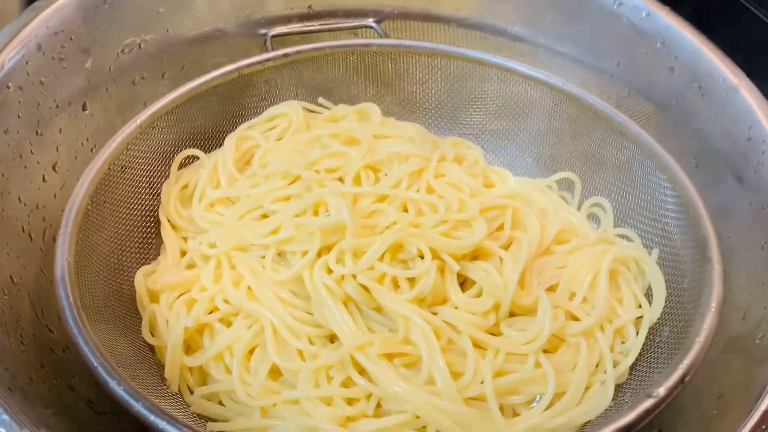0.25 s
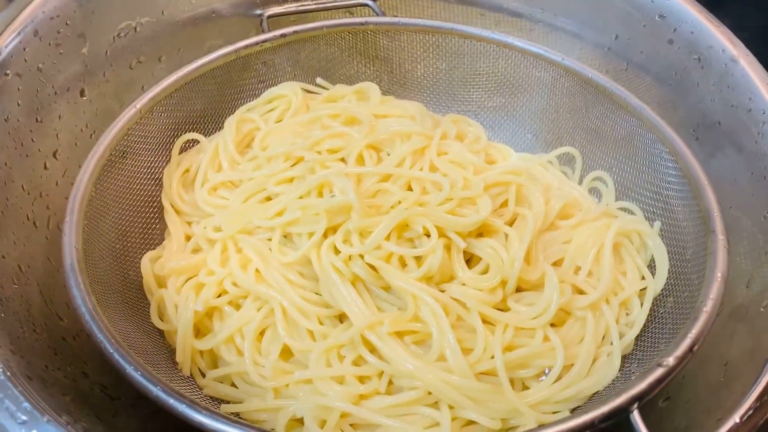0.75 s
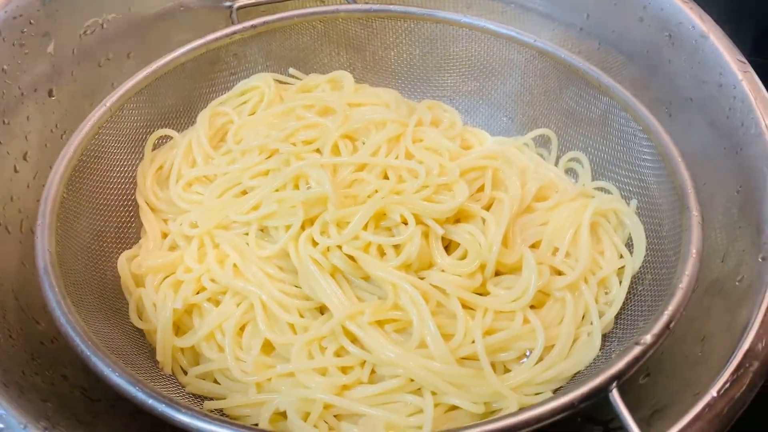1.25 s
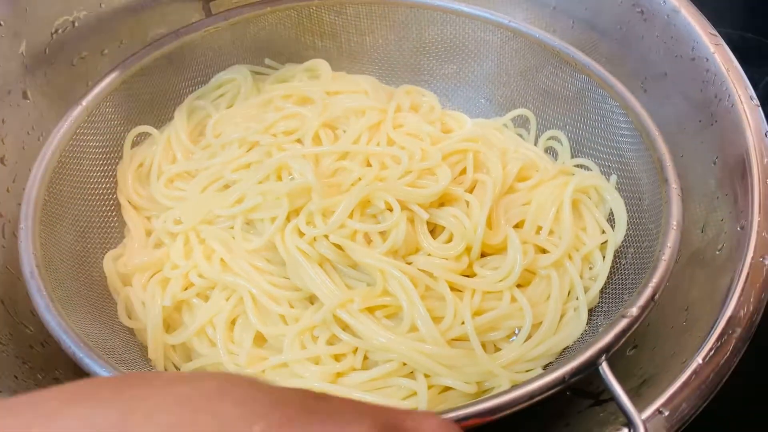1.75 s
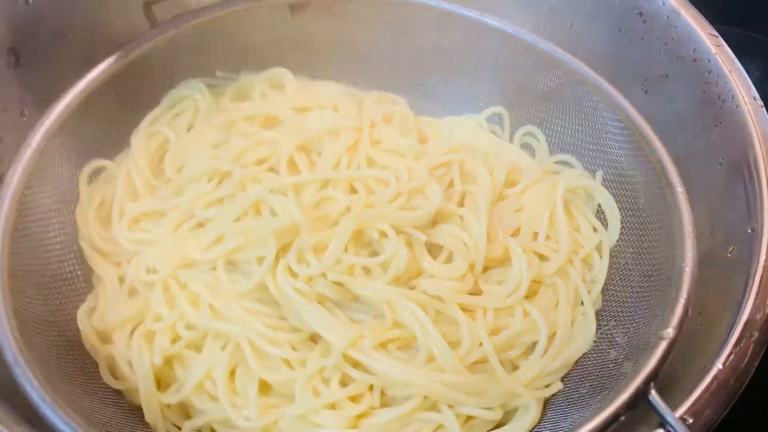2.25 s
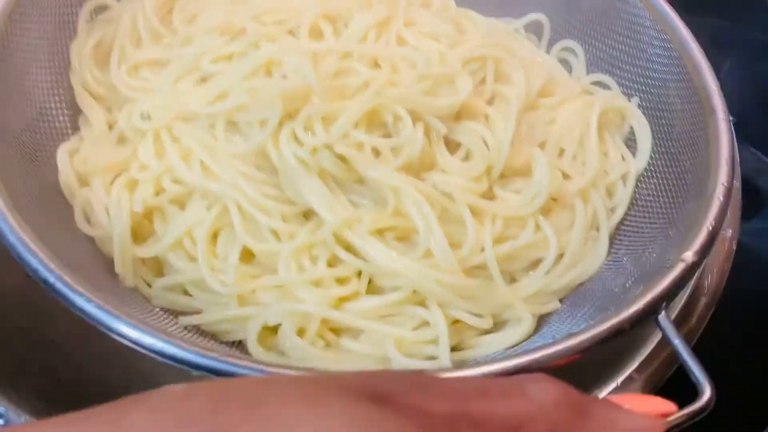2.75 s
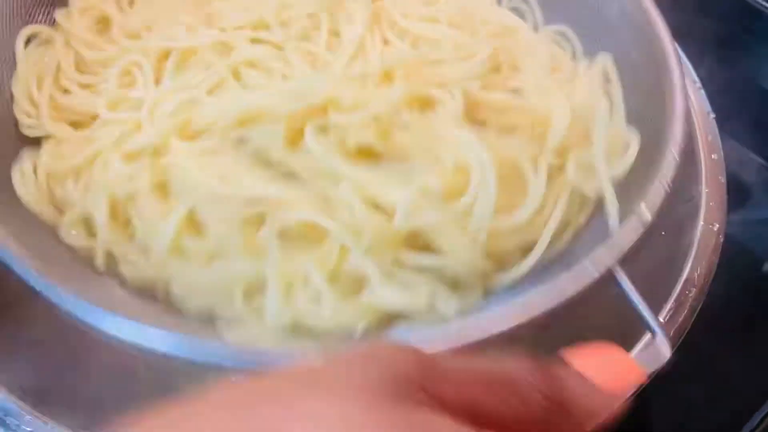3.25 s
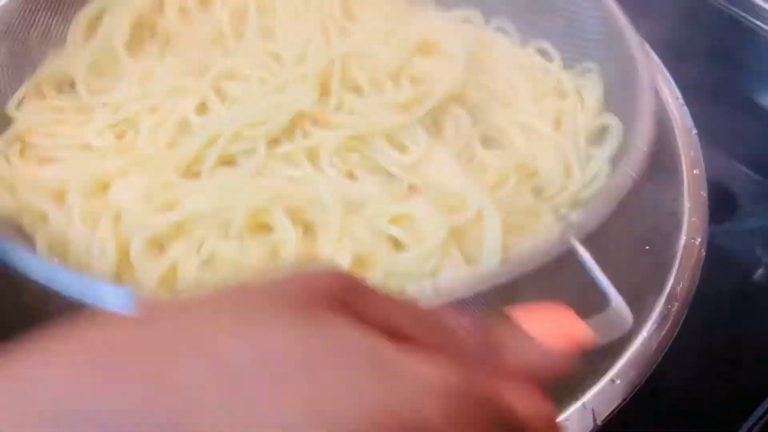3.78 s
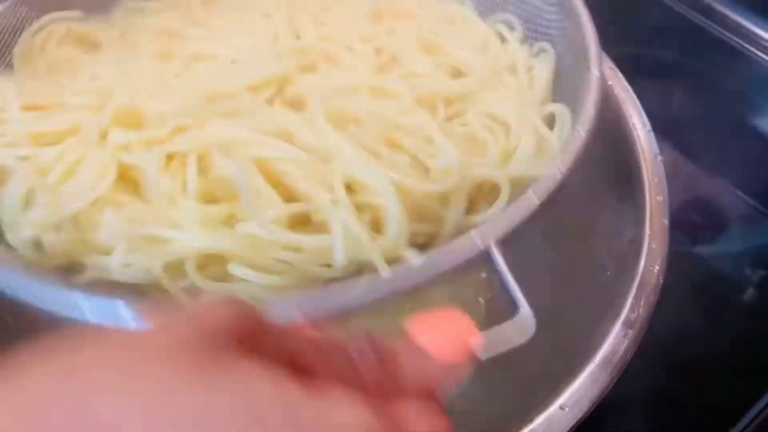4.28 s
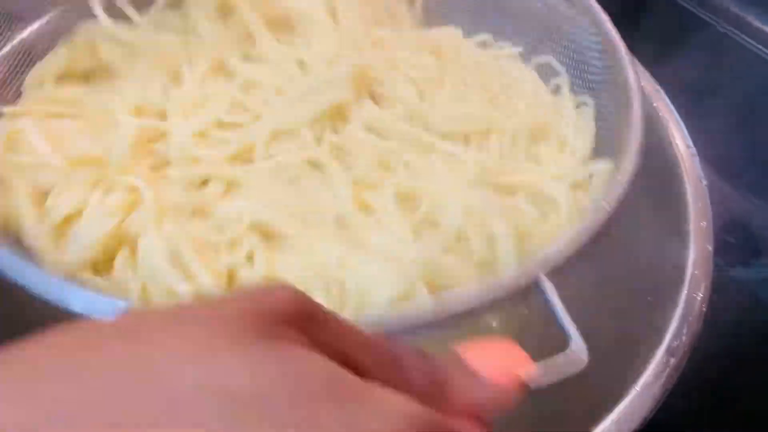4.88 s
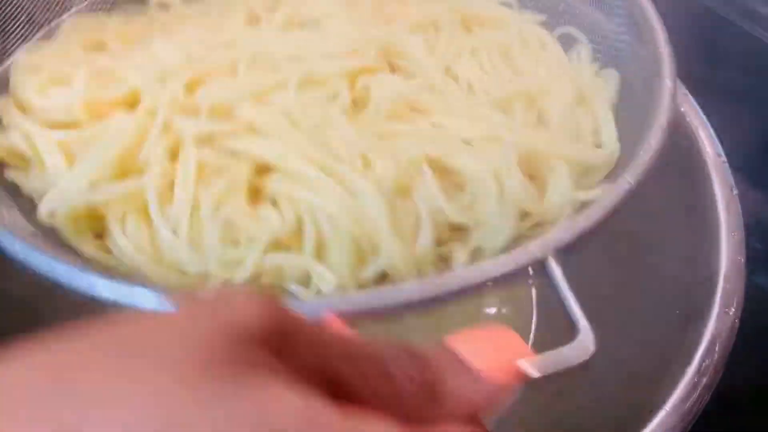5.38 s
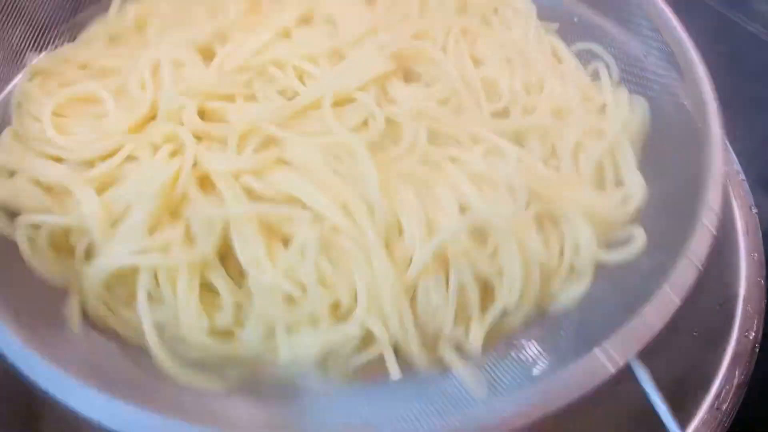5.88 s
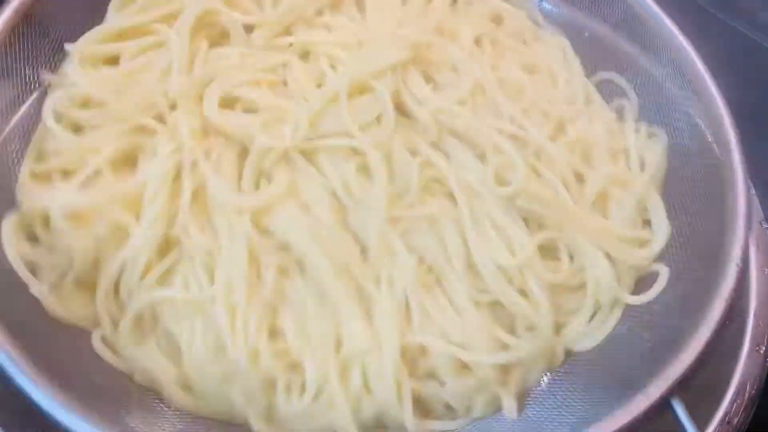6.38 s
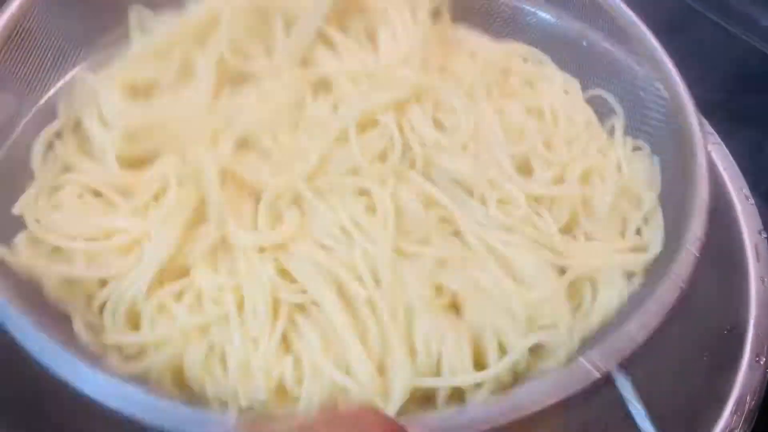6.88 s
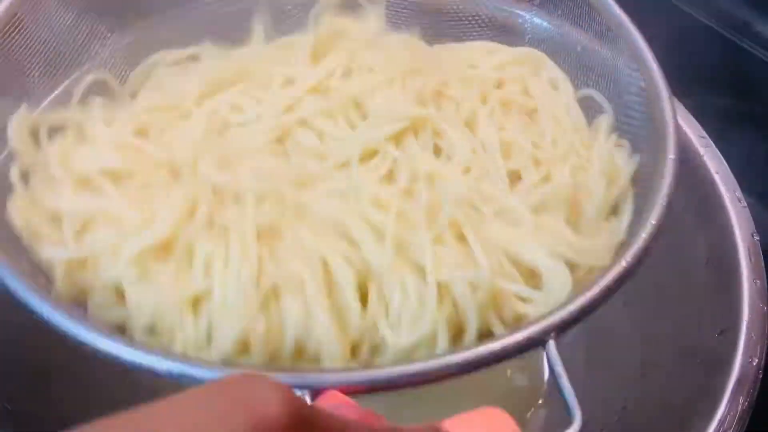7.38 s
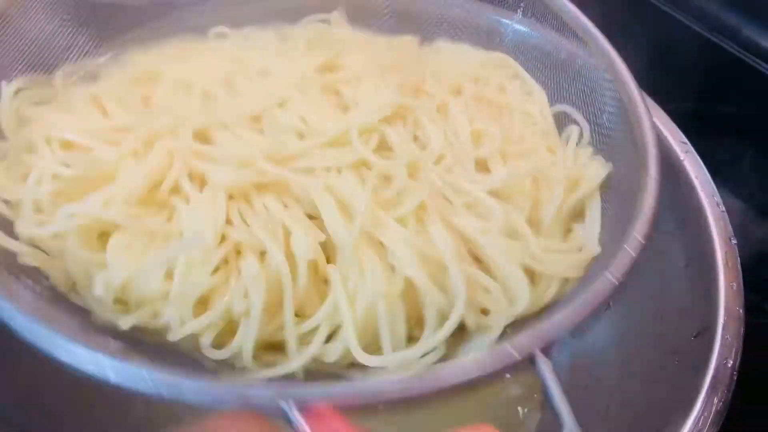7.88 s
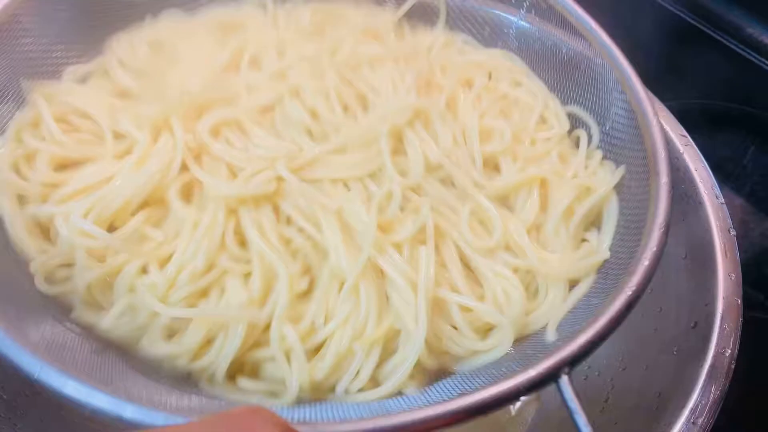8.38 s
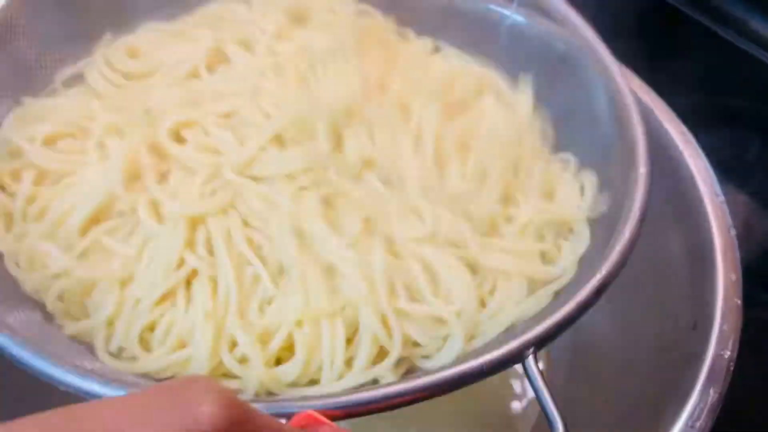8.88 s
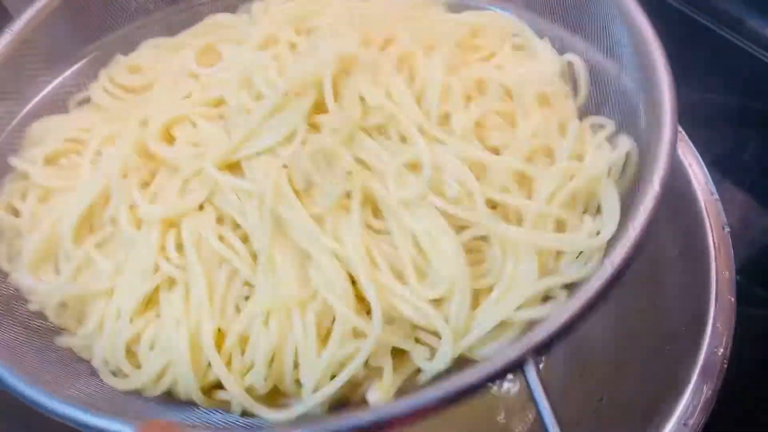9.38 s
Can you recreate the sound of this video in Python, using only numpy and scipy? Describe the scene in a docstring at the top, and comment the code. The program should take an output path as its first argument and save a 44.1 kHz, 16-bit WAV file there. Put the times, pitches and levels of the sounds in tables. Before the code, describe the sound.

Light metallic clinks and one loud pot clank, followed by rapid rhythmic shaking of wet noodles in a strainer, with faint water drips in a kitchen.

```python
"""Shaking wet pasta in a strainer

A mesh strainer of wet pasta clinks in a steel pot on a stove, clanks hard against it as it is lifted, is
shaken about nine times a second, slowing a little, then tossed a few times. Struck modes and noise make the
metal, crackling grains the squelching noodles, short hollow plinks the drips into the pot. A cooker fan
drones under it all; the small kitchen adds a short tail."""
import sys
import numpy as np
from scipy import signal
from scipy.fft import rfft, irfft, next_fast_len
from scipy.io import wavfile
from scipy.ndimage import uniform_filter1d

SR = 44100
rng = np.random.default_rng(int(sys.argv[2]) if len(sys.argv) > 2 else 0)


def transcribe(u):
    """Save the signal u as a 16-bit wav file named by the first command-line argument.

    u: samples, shape (n,) or (channels, n), limited to [-1, 1]; the rate is SR.
    q: integer samples, one column per channel.
    """
    v = np.clip(np.atleast_2d(u).T, -1, 1)
    q = np.round(v * 32767).astype(np.int16)
    wavfile.write(sys.argv[1], SR, q)


N = 424664

# Colour of the fan's drone. Each row: frequency in Hz, relative density in dB per Hz.
FAN_DRONE = [(15, -49), (25, -37), (37, -12), (54, -3), (97, -5), (133, -8), (166, -3), (219, -10.5),
             (241, -7), (303, 0.5), (380, -11.5), (648, -16), (703, -19), (926, -19), (1200, -28),
             (1560, -36.5), (2640, -120)]
# Colour of the fan's air hiss. Each row: frequency in Hz, relative density in dB per Hz.
FAN_HISS = [(600, -4.5), (1200, 4), (2200, 1), (3000, -1), (4300, -3), (5500, -8.5), (7000, -8),
            (11000, -9), (15500, -14)]
# Decay of the room. Each row: frequency in Hz, t60 in seconds.
KITCHEN_DECAY = [(100, 0.39), (500, 0.49), (2000, 0.69), (5000, 0.51), (8000, 0.21), (13000, 0.32)]
# Stereo width. Each row: frequency in Hz, gain of side over mid in dB.
SIDE_WIDTH = [(60, -12.5), (250, -13.5), (400, -9.5), (700, -4.5), (1300, -2.5), (2400, 0.5), (5000, 0.5),
              (6700, -2.5), (7700, -15), (8500, -25), (10000, -2), (13400, -27), (15000, -11)]
# Stereo balance. Each row: frequency in Hz, left over right in dB.
LEFT_LEAN = [(60, 0.5), (110, -4.5), (200, 1.5), (380, 1), (700, 3), (1290, 2), (2380, 0.5), (4400, -2.5),
             (8120, -0.5), (15000, 0.5)]
# Water drops into the pot. Each row: start in seconds, level in dB, pitch in Hz.
DRIPS = [(3.2703, -32, 1690), (4.8026, -28, 2410), (6.149, -45, 1640), (6.6793, -36, 2300),
         (8.1657, -43.5, 1870), (8.526, -42, 4200), (8.8837, -41.5, 1545), (8.9027, -29.5, 1040)]

# The pot base scuffs over the hob. Each row: time in seconds, level in dB.
SCUFF_LEVEL = [(0.0, -26.5), (.1, -35.5), (.16, -28), (.24, -39), (.5, -90)]
# Resonances of the scuffed base. Each row: frequency in Hz, width in Hz, relative level in dB.
BASE_RESONANCES = [(102, 32, -1.5), (203, 36, 1.5), (402, 28, -2.5), (505, 65, -4.5), (570, 42, -12),
                   (616, 19, 5), (1580, 36, -17), (1910, 110, -21)]

# The rim touches the pot. Each row: start in seconds, then knock, lip, hoop and tick level in dB,
# and the life of the touch as t60 in seconds.
CLINKS = [(1.107, -55, -49.5, -42, -46, 0.27), (1.509, -32, -42, -50, -65, .12),
          (1.53, -39, -45.5, -48, -72, 0.3), (1.574, -41.5, -46, -27, -40, 0.28),
          (1.735, -52, -54, -41, -49, 0.18), (1.755, -33.5, -50, -35, -34.5, 0.056),
          (2.164, -35, -35, -23.5, -38, 0.2), (2.234, -38, -49, -53, -58, .08),
          (2.441, -57, -53.5, -42.5, -60, 0.41), (2.487, -58, -59, -38, -35.5, 0.075),
          (2.574, -48, -43.5, -40, -49.5, .14), (8.683, -48, -47.5, -49, -30, 0.039),
          (8.795, -66, -60, -35.5, -43.5, .039)]
# The rim slides on the pot. Each row: middle in seconds, level in dB, spread of the swell in seconds,
# centre in Hz, spread in octaves.
SLIDES = [(0.847, -53, 0.055, 1700, 1.05), (1.006, -54, 0.026, 2020, 1.2),
          (1.127, -51.5, 0.022, 3570, 0.45), (2.026, -50.5, 0.047, 4330, .09),
          (2.033, -52, 0.081, 4700, 1.7), (2.616, -57, 0.15, 2070, 1.2)]
# Modes of the pot's lip. Each row: frequency in Hz, relative level in dB, t60 in seconds.
LIP_MODES = [(1320, 2.5, 0.31), (1394, -17, .3), (1740, 0.5, 0.44), (1890, -4, 0.38), (2150, -1, 0.18),
             (2285, 1.5, 0.11), (2545, 1, 0.18), (3080, -5, .25)]
# Modes of the wire rim. Each row: frequency in Hz, relative level in dB, t60 in seconds.
HOOP_MODES = [(3780, 3, 0.23), (4100, 6.5, 0.099), (4160, 6, 0.11), (4320, -5, 0.29), (4500, 4, 0.11),
              (4540, 3, 0.22), (4650, 0, .12), (5150, 2, 0.1), (5520, -4, 0.071), (5800, -31, 0.12),
              (6040, -6, .25), (6300, -2, 0.13), (7150, -2, 0.11)]

# Modes of the pot wall when free. Each row: frequency in Hz, relative level in dB, t60 in seconds.
POT_MODES = [(443, -1, 0.1), (627, 6.5, 0.081), (756, -5, 0.082), (909, -8, 0.13), (1020, -5, 0.1),
             (1298, -12.5, 0.45), (1340, -25, 0.15), (1620, -8, 0.62), (1740, -10, 0.36), (2105, -10, 1.4),
             (2550, -15, 0.28), (2485, -5.5, 0.11), (3150, -18, 0.21), (3200, -15.5, 0.29),
             (3400, -51, 0.53), (3730, -16, 0.24), (4105, -25, 0.62), (4290, -9, 0.16), (4530, -16, 0.18),
             (4680, -1.5, 0.045), (4823, -16, 0.11), (5663, -34, 0.37), (6153, -24, 0.13), (6300, -38, 0.2),
             (6200, -27, 0.15), (6450, -14, 0.095), (6950, -36, 0.55)]
# Modes of the stove under a landing. Each row: frequency in Hz, relative level in dB, t60 in seconds.
STOVE_MODES = [(57.3, -7, 0.2), (75, -6.5, 0.18), (94, -5.5, 0.16), (119.4, -4, 0.15), (153.2, -1.5, 0.18),
               (169.8, -1, 0.15), (274.2, 4, 0.16), (314, -6.5, 0.089), (347.3, -12.5, 0.13)]
# The strainer's frame, ringing on after the clank. Each row: frequency in Hz, relative level in dB,
# t60 in seconds.
FRAME_MODES = [(275, -9, 1.04), (70.2, 3, 1.46), (490, -6, 1.2), (1130, -21.5, 1.83), (1370, -13.5, 2.5),
               (1630, -5, 0.57), (1900, -16, 0.5), (2090, -4, 0.71), (2611, -5.5, 0.69)]
# Colour of the rattling mesh. Each row: frequency in Hz, relative density in dB per Hz.
CLATTER_COLOUR = [(240, -9.5), (400, 3), (1180, -13), (1680, -8.5), (2840, -15), (4730, -19.5), (8110, -20),
                  (8630, -52), (9040, -20.5), (10400, -24), (16000, -32)]
# The strainer strikes the pot wall. Each row: start in seconds, pot level in dB, clatter level in dB.
STRIKES = [(0.004, -34.5, -38), (0.112, -45, -33), (0.137, -45, -25.5), (0.369, -64, -51),
           (2.715, -14, -12)]
# The pot lands on the hob and rocks. Each row: start in seconds, then thud, pot and clatter level in dB,
# time between landings in seconds, thud loss per landing in dB.
LANDINGS = [(0.124, -23.5, -36.5, -28, .0277, 2.5), (2.725, -8.5, -24.5, -18.5, .0235, 13)]

# The shaking slows as the arm tires. Each row: time in seconds, strokes per second.
TEMPO = [(2.963, 9.737), (4.2, 9.072), (6.8, 8.82), (8.35, 8.695)]
# Strength of the strokes. Each row: time in seconds, level in dB.
VIGOUR = [(2.96, -43), (3.2, -52.5), (4.0, -50), (6.8, -49.5), (8.0, -48), (8.3, -49)]
# The wet heap's fizzle between strokes. Each row: time in seconds, level in dB.
FIZZLE = [(0, -48), (.75, -78), (.84, -54.5), (.92, -68), (1.9, -71), (2.7, -57.5), (8.25, -60),
          (8.46, -62.5), (8.65, -56), (9.6, -58)]
# Colour of the squelch before its hollow. Each row: frequency in Hz, relative density in dB per Hz.
SQUELCH_COLOUR = [(2000, -36), (2900, -19), (3400, -12.5), (4000, -14), (4900, -8), (5600, -9.5),
                  (6600, -1), (7900, -4.5), (8600, 0), (10500, -4.5), (12500, -4), (15500, -8)]
# The loudest snaps of wet strands. Each row: start in seconds, level in dB.
SMACKS = [(2.4254, -39.5), (2.9617, -31), (3.328, -34.5), (3.758, -34), (4.493, -35.5), (4.752, -36.5),
          (5.4321, -33), (5.6002, -34), (6.1, -35), (6.5826, -35), (7.0329, -33.5), (7.2559, -33.5),
          (7.4834, -34.5), (7.9423, -33)]

TOP_HZ = 15800  # the microphone's upper limit
SKEW_HZ, SKEW_LAG_S = 1550, 1 / 4700  # above this frequency the left trails the right by this time

KNOCK_DB, LIP_DB, HOOP_DB, TICK_DB, CRACK_DB = -0.5, -0.3, -4, -0.5, 3.5  # balance of a touch
KNOCK_RISE_S = 0.014  # the dull knock builds up, the tick does not

GRAZE_LEAD_S, GRAZE_DB = 0.009, -12.5  # the rim grazes the wall just before each strike
ROCK_LOSS_DB = 3  # the steel rings this much less at each further landing
FRAME_DB = -32.5
# A low hum blooms after the clank and lingers.
HUM_HZ, HUM_DB, HUM_T60_S, HUM_BLOOM_S = 161, -31.5, 2.97, 0.29

PUSH_DB, PUSH_LATE_S = 1.5, 0.0059  # every second stroke is a push: stronger and a little late
STROKE_SCATTER_DB = 0.6
RISE_S, FALL_S = 0.014, 0.018  # a stroke's swell of crackle
# A few slower tosses at the end, each landing with a soft knock.
TOSS_START_S, TOSS_EVERY_S, TOSS_DB = 9.034, 0.197, -50
TOSS_KNOCK_DB, TOSS_KNOCK_HZ, TOSS_KNOCK_OCTAVES, TOSS_KNOCK_S = -50, 880, 1.15, 0.0092
SMACK_GAIN_DB, SMACK_T60_S = -4, 0.026
SMALL_SMACK_DB, SMALL_SMACK_LEAD_S = -45, 0.009  # faint ones come as each stroke sets in
# The squelch has a hollow resonance that sinks as the heap packs together.
LOOSE_HZ, PACKED_HZ = 4580, 3350
HOLLOW_WIDTH = 0.38  # as a share of its frequency


def amp(db):
    """Decibels to gain."""
    return 10 ** (np.asarray(db) / 20)


def unit(x):
    """Scale to rms 1."""
    return x / np.sqrt(np.mean(x ** 2) + 1e-20)


def along(points, hz):
    """Read (Hz, value) points on a log frequency axis."""
    point_hz, values = np.transpose(points)
    return np.interp(np.log(hz + 1), np.log(point_hz + 1), values)


def curve(rows):
    """One value per sample from (seconds, value) points."""
    return np.interp(np.arange(N) / SR, *np.transpose(rows))


def filtered(x, response):
    """Shape the spectrum of x by a response of frequency."""
    n = x.shape[-1]
    m = next_fast_len(n + 4096)
    return irfft(rfft(x, m) * response(np.fft.rfftfreq(m, 1 / SR)), m)[..., :n]


def noise(colour, size):
    """Mid and side noise of rms 1 with a given colour."""
    return unit(filtered(rng.standard_normal((2, size)), lambda hz: amp(along(colour, hz))))


def band(centre_hz, octaves, size):
    """Mid and side noise of rms 1 that stands for a crowd of modes round a centre."""
    def hump(hz):
        distance = np.log2((hz + 1) / centre_hz) / octaves
        return 1 / (1 + distance ** 4)
    return unit(filtered(rng.standard_normal((2, size)), hump))


def fade(t60, size):
    """Exponential decay."""
    return amp(-60 * np.arange(size) / SR / max(t60, 0.002))


def bell(before_s, after_s, size):
    """A smooth swell that peaks in the middle of its span."""
    t = (np.arange(size) - size // 2) / SR
    return np.exp(-0.5 * (t / np.where(t < 0, before_s, after_s)) ** 2)


def ring(modes, size, attack, scatter_db):
    """Decaying sine modes in mid and side, struck from rest at new strengths for each blow."""
    t = np.arange(size, dtype=np.float32) / SR
    hz, db, t60 = np.float32(modes).T
    gain = amp(db + scatter_db * rng.standard_normal((2, len(hz))))
    gain /= np.sqrt(np.sum(amp(db) ** 2) / 2)  # rms 1 at the start, before attack and scatter
    gain[0] *= (-1) ** np.arange(len(hz))
    gain[1] *= rng.choice([-1, 1], len(hz))
    decay = np.exp(-np.float32(np.log(1000)) * t / t60[:, None])
    waves = np.sin(2 * np.pi * hz[:, None] * t) * decay
    return gain @ waves * (1 - np.exp(-t / attack))


def add(track, s, sound):
    """Mix a sound into a track at time s."""
    i = max(round(s * SR), 0)
    track[:, i:i + sound.shape[1]] += sound[:, :N - i]


def fan():
    """The cooker fan: a steady low drone under soft air hiss."""
    return amp(-48.0) * noise(FAN_DRONE, N) + amp(-60.5) * noise(FAN_HISS, N)


def kitchen(x):
    """The tail of a small hard room: decaying noise, different in mid and side."""
    hz, t, z = signal.stft(rng.standard_normal((2, SR * 2 // 3)), SR, nperseg=256)
    decay = amp(-60 * t / along(KITCHEN_DECAY, hz)[:, None])
    tail = signal.istft(z * decay, SR, nperseg=256)[1]
    tail = np.pad(tail / np.linalg.norm(tail[0]), ((0, 0), (SR // 150, 0)))  # a short gap comes first
    return signal.fftconvolve(x, tail, axes=1)[:, :N]


def drips():
    """A drop slaps the water and the pot gives back a short, hollow plink."""
    out, n = np.zeros((2, N)), SR // 5
    for s, db, hz in DRIPS:
        bubble = ring([(hz, 0, 0.035), (hz * 1.6, -4, 0.03)], n, attack=0.0011, scatter_db=0.5)
        splash = (0.89 * band(hz, 0.23, n) + 0.5 * band(hz * 0.87, 1.0, n)) * fade(0.094, n)
        add(out, s, amp(db - 7) * (0.53 * bubble + splash))
    return out


def scuff(slip_rate=500):
    """The base sticks and slips on the hob; each slip kicks its resonances."""
    slips = rng.standard_normal((2, N)) * (rng.random(N) < slip_rate / SR)

    def base(hz):
        total = 0
        for k, (centre, width, db) in enumerate(BASE_RESONANCES):
            damping = 1j * hz * width
            total = total + (-1) ** k * amp(db) * damping / (centre * centre - hz * hz + damping)
        return total
    return unit(filtered(slips, base)) * amp(curve(SCUFF_LEVEL))


def rim():
    """Light touches of the wire rim: dull knock, pot lip, bright hoop and tick; it also slides."""
    out, n = np.zeros((2, N)), SR // 3
    for s, knock_db, lip_db, hoop_db, tick_db, life in CLINKS:
        knock = band(750, 0.51, n) * fade(0.28, n) * (1 - fade(KNOCK_RISE_S, n))
        lip = ring(LIP_MODES, n, attack=0.00076, scatter_db=3.0) + 0.45 * band(1850, 0.76, n)
        hoop = ring(HOOP_MODES, n, attack=0.0017, scatter_db=1) + 0.41 * band(4670, 0.33, n)
        tick = band(8500, 0.64, n) * fade(life * 0.76, n)
        crack = band(7500, 0.59, n) * fade(0.008, n)
        body = amp(knock_db + KNOCK_DB) * knock + amp(lip_db + LIP_DB) * lip + amp(hoop_db + HOOP_DB) * hoop
        edge = amp(tick_db + TICK_DB) * tick + amp(tick_db + CRACK_DB) * crack
        add(out, s, body * fade(life, n) + edge)
    for s, db, spread_s, hz, octaves in SLIDES:
        add(out, s - n / 2 / SR, amp(db) * band(hz, octaves, n) * bell(spread_s, spread_s, n))
    return out


def fine_modes(low_hz, high_hz, t60, count):
    """The crowd of weak modes of thin steel, uneven in strength and life."""
    hz = np.linspace(np.sqrt(low_hz), np.sqrt(high_hz), count) ** 2
    hz = hz * np.exp(0.015 * rng.standard_normal(count))
    db = along(CLATTER_COLOUR, hz) + 5 * np.log10(hz / low_hz) + 2 * rng.standard_normal(count)
    return np.transpose([hz, db, t60 * 2 ** rng.uniform(-0.25, 0.57, count)])


def pot(longest=0.49, count=4):
    """Each contact rings the pot wall and rattles the mesh; each landing also thuds through the stove."""
    out, n = np.zeros((2, N)), SR // 3
    steel = fine_modes(low_hz=429.3, high_hz=11990, t60=0.21, count=260)
    pressed = [(hz, db, min(t60, longest)) for hz, db, t60 in POT_MODES]  # contact damps the wall
    contacts = list(STRIKES)
    for s, pot_db, clatter_db in STRIKES:
        contacts.append((s - GRAZE_LEAD_S, pot_db + GRAZE_DB, clatter_db + GRAZE_DB))
    for s, thud_db, pot_db, clatter_db, every_s, loss_db in LANDINGS:
        for k in range(count):
            landing_s, rock_db = s + k * every_s, -k * ROCK_LOSS_DB
            thud = ring(STOVE_MODES, n, attack=0.0022, scatter_db=0.7)
            add(out, landing_s, amp(thud_db + 4 - k * loss_db) * thud)
            contacts.append((landing_s, pot_db + rock_db, clatter_db + rock_db))
    for s, pot_db, clatter_db in contacts:
        wall = ring(pressed, n, attack=0.00028, scatter_db=4.5)
        bonk = amp(2.5) * band(860, 0.66, n) * fade(0.043, n)  # the flexing wall's first few milliseconds
        rattle = 0.5 * ring(steel, n, attack=0.0034, scatter_db=1.0)
        rattle = rattle + 0.95 * noise(CLATTER_COLOUR, n) * fade(0.11, n)
        add(out, s, amp(pot_db) * (wall + bonk) + amp(clatter_db) * rattle)
    clank_s = LANDINGS[-1][0]
    add(out, clank_s, amp(FRAME_DB) * ring(FRAME_MODES, SR * 2, attack=0.0066, scatter_db=3.0))
    hum = ring([(HUM_HZ, 0, HUM_T60_S)], SR * 3, attack=HUM_BLOOM_S, scatter_db=1.5)
    add(out, clank_s, amp(HUM_DB) * hum)
    return out


def strokes():
    """Time and strength of each stroke of the shaking, pulls and pushes in turn."""
    t = np.arange(TEMPO[0][0], TEMPO[-1][0], 1 / SR)
    done = np.cumsum(np.interp(t, *np.transpose(TEMPO))) / SR  # strokes made so far
    k = np.arange(int(done[-1]) + 1)
    is_push = k % 2
    times = np.interp(k, done, t) + is_push * PUSH_LATE_S
    levels = np.interp(times, *np.transpose(VIGOUR)) + is_push * PUSH_DB
    return list(zip(times, levels + STROKE_SCATTER_DB * rng.standard_normal(len(k))))


def patchy(x, depth_db):
    """The colour shifts from moment to moment as the heap changes shape."""
    z = signal.stft(x, nperseg=512)[2]
    field = rng.standard_normal(z.shape[1:])
    field = uniform_filter1d(field, size=5, axis=0)  # smooth over frequency
    field = uniform_filter1d(field, size=8, axis=1)  # smooth over time
    return unit(signal.istft(z * amp(depth_db * unit(field)), nperseg=512)[1][:, :N])


def squelch(grain_db=4, count=4):
    """Dense tiny crackles of wet strands; their hollow sinks the longer the heap has been shaken."""
    packing = curve([(TEMPO[0][0], 0), (TEMPO[-1][0], count - 1)])
    out = np.zeros((2, N))
    for k, hollow_hz in enumerate(np.linspace(LOOSE_HZ, PACKED_HZ, count)):
        sparks = rng.standard_normal((2, N)) * (rng.random(N) < 0.16)
        sparks = sparks * amp(grain_db * np.minimum(rng.exponential(size=N), 2))

        def wet_hollow(hz):
            hollow = hz ** 2 / (hollow_hz ** 2 - hz ** 2 + 1j * HOLLOW_WIDTH * hollow_hz * hz)
            return amp(along(SQUELCH_COLOUR, hz)) * hollow
        share = np.maximum(1 - np.abs(packing - k), 0)  # crossfade from one hollow to the next
        out += np.sqrt(share) * unit(filtered(sparks, wet_hollow))
    return patchy(out, depth_db=4.0)


def noodles(count=4):
    """Each stroke or toss presses the wet strands on the mesh in a swell of crackle, with sharper smacks."""
    swell, out, n = np.zeros((1, N)), np.zeros((2, N)), SR // 4
    half_s = n / 2 / SR
    shakes = strokes()
    tosses = [(TOSS_START_S + k * TOSS_EVERY_S, TOSS_DB) for k in range(count)]
    for s, db in shakes + tosses:
        add(swell, s - half_s, amp(db) * bell(RISE_S, FALL_S, n)[None])
    for s, _ in tosses:
        knock = band(TOSS_KNOCK_HZ, TOSS_KNOCK_OCTAVES, n) * bell(TOSS_KNOCK_S, TOSS_KNOCK_S, n)
        add(out, s - half_s, amp(TOSS_KNOCK_DB) * knock)
    smacks = list(SMACKS)
    for s, _ in shakes:
        small_s = s - SMALL_SMACK_LEAD_S + rng.normal(0, 0.0036)
        smacks.append((small_s, SMALL_SMACK_DB + rng.normal(0, 1.6)))
    for s, db in smacks:
        smack = band(9000, 0.74, SR // 20) * fade(SMACK_T60_S, SR // 20)
        add(out, s, amp(db + SMACK_GAIN_DB) * smack)
    return out + np.hypot(swell, amp(curve(FIZZLE))) * squelch()


def scene():
    """All sources in the room; the bass is near mono, the middle wide, the treble leads on the right."""
    clank, clinks, shake, drops = pot() + scuff(), rim(), noodles(), drips()
    room = kitchen(amp(-10.5) * clank + amp(-9.5) * clinks + amp(-10.5) * shake + amp(-12) * drops)
    mid, side = clank + clinks + shake + drops + room + fan()
    side = filtered(side, lambda hz: amp(along(SIDE_WIDTH, hz)))

    def left_right(hz):
        late = np.maximum(hz - SKEW_HZ, 0) * SKEW_LAG_S
        lag = np.exp(2j * np.pi * np.outer([-0.5, 0.5], late))
        return lag * amp(np.outer([0.5, -0.5], along(LEFT_LEAN, hz)))
    return filtered(np.array([mid + side, mid - side]), left_right)


def record(dry):
    """The microphone rounds off the hardest peaks and has a band limit."""
    soft = dry / (1 + np.abs(dry / 0.95) ** 4) ** (1 / 4)
    return filtered(soft, lambda hz: hz < TOP_HZ)


dry = scene()
out = record(dry)
transcribe(out)
```